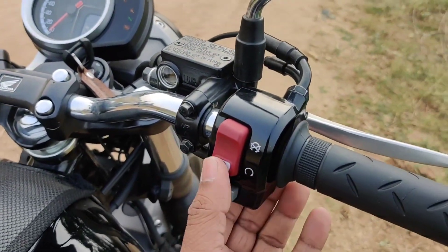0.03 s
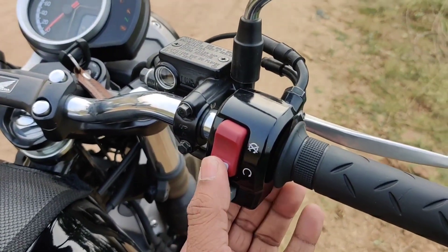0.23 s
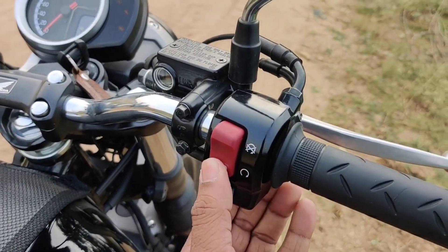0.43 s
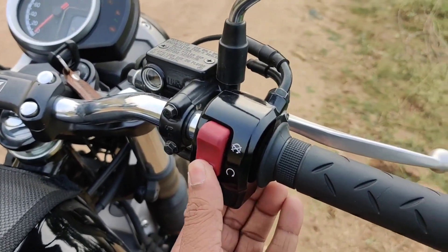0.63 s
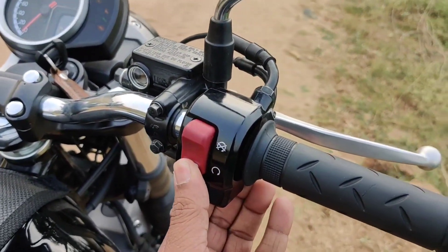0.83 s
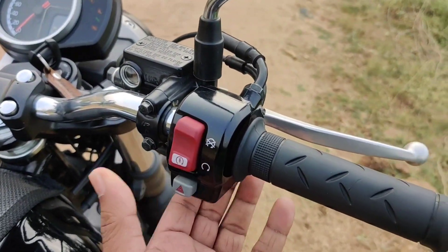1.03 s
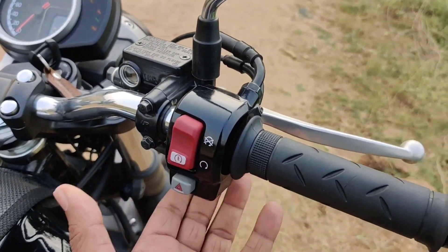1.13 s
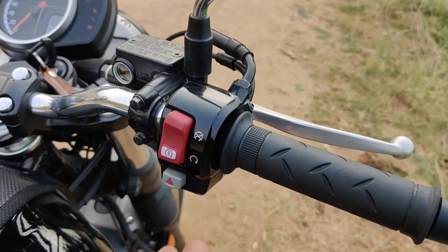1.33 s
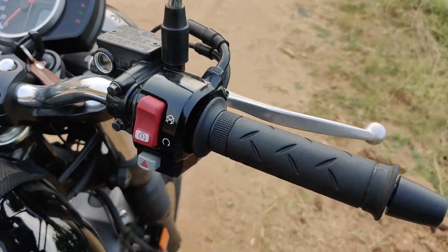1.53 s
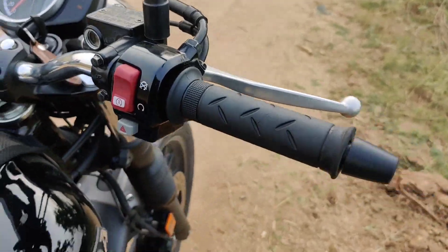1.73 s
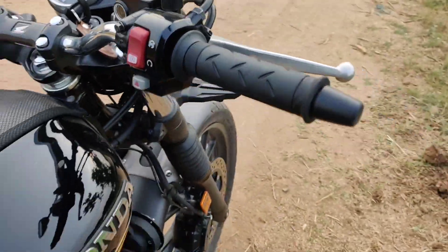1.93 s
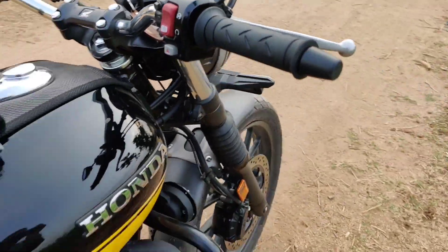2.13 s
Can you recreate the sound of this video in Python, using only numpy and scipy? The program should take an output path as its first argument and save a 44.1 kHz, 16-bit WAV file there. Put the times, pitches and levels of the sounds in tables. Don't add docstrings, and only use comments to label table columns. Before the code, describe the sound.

A motorcycle engine starts outdoors, heard close on a phone. Light low wind and a faint falling bird call fill the first 0.4 seconds. At 0.43 the starter clicks in, grinding and whining in uneven, raspy surges until about 0.92. The engine fires with a bark at 0.95, stumbles softly, thumps again at 1.2, then idles at roughly nine low thumps per second with metallic valve and chain clatter.

```python
import sys
import numpy as np
from scipy import signal
from scipy.io import wavfile
from scipy.ndimage import uniform_filter1d

SR = 44100
rng = np.random.default_rng(int(sys.argv[2]) if len(sys.argv) > 2 else 0)


def undo_db(level):
    steps = np.asarray(level, float) / 20
    return 10 ** steps


def persist_wave(psi):
    counts = np.round(np.clip(psi, -1, 1) * 32767).astype(np.int16)
    wavfile.write(sys.argv[1], SR, np.atleast_2d(counts).T)


N = 95697

# [f/Hz, level/dB per Hz]
WIND = [(12, -17), (20, -10.5), (91, -5.5), (107, -17.5), (140, -10.5), (161, -12.5), (300, -26),
        (480, -52), (1540, -120)]
# [t/s, level/dB]
HUM_LEVEL = [(0, -52.5), (.145, -55), (.149, -42.5), (.16, -55), (.3, -48.5), (.42, -55)]
# [f/Hz, width/Hz, level/dB]
HUM_BANDS = [(1160, 990, 0.5), (3040, 1040, -8.5), (4640, 130, -1)]
# [start t/s, length/s, from f/Hz, to f/Hz, level/dB]
BIRD = [
    (.085, .035, 6300, 7000, -66),
    (.137, .125, 7800, 5200, -52),
    (.29, .05, 5000, 3900, -68),
    (0, .012, 7000, 6900, -49),
]
# [start t/s,
# length/s, level/dB, place of the peak 0-1]
STRAINS = [(0.432, 0.0076, -20.5, 0.4), (0.443, 0.011, -20, 0.3), (0.458, 0.089, -25, 0.4),
           (0.589, 0.14, -24, 0.17), (0.708, 0.13, -22, 0.52), (0.864, 0.029, -22, 0.37),
           (0.883, 0.036, -18.5, 0.59), (.985, 0.0262, -28.5, 0.2), (1.016, 0.012, -34.5, 0.2),
           (1.292, 0.0057, -45, 0.1), (1.96, 0.0098, -45, .1)]
# [f/Hz, width/Hz, level/dB]
CASING = [(819, 35, -1), (1307, 80, -1), (1688, 180, 7.5), (2196, 63, -0.5), (2990, 240, 3.5),
          (3560, 49, -0.5), (4846, 58, 3), (5430, 75, -1), (7400, 800, 11)]
# [start t/s, length/s, from f/Hz, to f/Hz, level/dB]
WHINES = [(.476, .022, 2950, 3350, -24), (.492, .02, 3400, 3700, -27), (.508, .032, 3550, 4150, -25),
          (.535, .02, 3950, 4000, -35), (.49, .03, 2850, 2850, -36), (.518, .016, 2900, 2930, -20),
          (.534, .026, 2850, 3400, -22), (.56, .04, 3450, 4150, -25), (.598, .022, 4130, 4200, -30),
          (.48, .014, 9500, 9500, -30), (.52, .016, 8900, 8800, -33), (.885, .03, 2900, 3300, -24),
          (.9, .07, 4050, 4800, -38), (1.125, .045, 4250, 4010, -33), (1.163, .042, 4010, 3970, -31),
          (1.43, .035, 4100, 3980, -38)]
# [start t/s, length/s, from f/Hz, to f/Hz, level/dB]
PANELS = [(.6, .04, 770, 770, -29), (.755, .055, 1800, 1800, -26), (.754, .018, 4870, 4860, -21),
          (.898, .018, 790, 790, -27), (.432, .007, 1250, 950, -31), (.432, .008, 3300, 3100, -27),
          (.433, .02, 800, 760, -31), (.445, .012, 3450, 3450, -30), (.645, .012, 4850, 4800, -26),
          (.84, .025, 4900, 5050, -35), (.505, .035, 720, 700, -33)]
# [start t/s, length/s, from f/Hz, to f/Hz, level/dB]
FINS = [(1.69, 0.013, 2400, 2420, -41), (1.8, 0.024, 2376, 2370, -38), (1.855, 0.019, 2435, 2485, -33),
        (1.91, 0.029, 1666, 1660, -35), (1.965, 0.018, 2380, 2330, -32), (1.97, 0.021, 3100, 3050, -33),
        (1.975, 0.033, 1720, 1714, -33.5), (2.028, 0.027, 1660, 1700, -31), (2.082, 0.031, 2300, 2290, -32),
        (2.089, 0.023, 1640, 1587, -30.5), (2.122, 0.039, 932, 950, -39.5)]
# [t/s, level/dB]
GROWL = [(.43, -60), (.445, -16), (.48, -5.5), (.565, -8.5), (.595, -32), (.64, -6), (.72, -33),
         (.8, -13.5), (.9, -10.5), (.97, -12), (1.05, -18), (2.17, -18.5)]
# [crest t/s, level/dB, f/Hz, silencer ring level/dB]
MISFIRES = [
    (0.6294, -16.5, 64, -22.5),
    (1.0676, -7, 65, -22),
]
# [t/s, puff level/dB, silencer ring level/dB, puff f/Hz, bark level/dB]
FIRINGS = [
    (0.9505, -3.5, -13, 90, -12.5),
    (1.196, -3.5, -13.5, 93, -21.5),
    (1.3172, -5.5, -14.5, 92, -27),
    (1.4293, -5.5, -14, 96, -28),
    (1.545, -8, -15, 91.4, -49),
    (1.6594, -8, -15.5, 96, -40),
    (1.7727, -8.5, -14.5, 91.7, -43),
    (1.885, -7.5, -14, 96.5, -33),
    (1.9976, -6.5, -14.5, 93.7, -26),
    (2.1106, -7.5, -14, 94, -42),
]
# [f/Hz, level/dB]
GAS = [(40, -0.5), (130, -5.5), (300, -3), (450, -3.5), (900, -28), (3000, -60.5)]
# [t/s, level/dB]
CLATTER = [(.9, -68), (.93, -31), (1.0, -31), (1.2, -31), (1.5, -31), (1.8, -32), (2.0, -33), (2.17, -29.5)]
# [f/Hz, width/Hz, level/dB]
CASES = [(816, 115, -1), (1325, 230, -2), (1500, 385, 4), (2420, 58, -5.5), (3200, 280, 0), (4060, 12, -17),
         (4810, 470, -5), (8170, 670, -2)]
# [lead/s, spread/s, level/dB]
VALVES = [
    (0.017, 0.014, -3),
    (0.083, 0.0079, -4),
    (0.0683, 0.0024, -10),
]
# [t/s, level/dB]
KNOCKS = [(0.6482, -29), (0.6714, -25), (0.7347, -39), (0.7577, -25), (0.867, -26), (0.9474, -37),
          (0.9871, -10.5), (1.0136, -33), (1.0358, -14), (1.1652, -18.5), (1.2294, -28), (1.287, -32),
          (1.341, -28), (1.5244, -39), (1.634, -23), (1.679, -28), (1.692, -19.5), (1.7495, -19),
          (1.799, -32), (1.8577, -26), (1.919, -26), (1.9689, -38), (2.084, -34), (2.1306, -34)]
# [f/Hz, width/Hz, level/dB]
HEAD = [(866, 740, 2), (2375, 95, 4), (3046, 94, -3), (4850, 590, -1), (7200, 1600, 0)]
# [t/s, level/dB]
TAPPETS = [(.95, -39.5), (1.5, -35), (1.8, -29), (2.17, -30)]
# [f/Hz, level/dB]
LEFT = [(250, 5), (700, 2), (3300, -0.5), (4250, -1.5), (5100, 1), (6000, -14.5), (9500, -17.5),
        (16000, -24)]
# [f/Hz, level/dB]
RIGHT = [(250, 6.5), (700, -5.5), (1100, 0.5), (2000, 0), (3300, -14.5), (4300, -24), (6000, -48.5),
         (16000, -48.5)]
# [t/s, f/Hz, boost level/dB]
CUP = [(0, 1270, 3.5), (.45, 1470, 12.5), (1.0, 1500, 15), (1.35, 1500, 15.5), (1.78, 1493, 13.5),
       (1.87, 1530, 11), (2.17, 1680, -6)]


def evened(x):
    return x / np.sqrt(np.mean(x ** 2) + 1e-20)


def along(curve, axis=1):
    points = np.array(curve)
    return np.interp(np.arange(N) / SR, points[:, 0], points[:, axis])


def bump(t, width):
    return np.exp(-.5 * (t / width) ** 2)


def burst(t, rise, fall):
    return np.exp(-abs(t) / np.where(t < 0, rise, fall))


def highpass(x, order, hz):
    return signal.lfilter(*signal.butter(order, hz, "high", fs=SR), x)


def colour(x, points):
    hz = np.fft.rfftfreq(4096, 1 / SR)
    f, db = np.transpose(points)
    log_gain = np.log(undo_db(np.interp(np.log(hz + 1), np.log(f), db)))
    full = np.concatenate([log_gain, log_gain[-2:0:-1]])
    minimum_phase = np.exp(np.conj(signal.hilbert(full)))
    response = np.fft.ifft(minimum_phase).real[:2048]
    return signal.oaconvolve(x, response)[:N]


def resonate(x, hz, width):
    turn = np.exp(2j * np.pi * np.cumsum(hz * np.ones(N)) / SR)
    r = np.exp(-np.pi * width / SR)
    return 2 * (turn * signal.lfilter([1 - r], [1, -r], x / turn)).real


def patchy(x, depth_db):
    z = signal.stft(x, nperseg=256)[2]
    field = uniform_filter1d(rng.standard_normal(z.shape[1:]), size=7, axis=0)
    field = uniform_filter1d(field, size=8, axis=1)
    return signal.istft(z * undo_db(depth_db * evened(field)), nperseg=256)[1][:, :N]


def rattle(modes, per_s, spread_db, rub, broad_db):
    size = undo_db(spread_db * np.minimum(rng.exponential(1, (2, N)), 3))
    size = size * (rng.random((2, N)) < per_s / SR)
    hits = evened(size * rng.standard_normal((2, N)))
    noise = rng.standard_normal((2, N))
    rung = 0
    for hz, width, db in modes:
        struck = np.roll(hits + rub * noise, rng.integers(N), axis=1)
        rung = rung + undo_db(db) * evened(resonate(struck, hz, width))
    broad = highpass(patchy(noise + 0.29 * hits, depth_db=4.5), 2, 375)
    return evened(rung + undo_db(broad_db) * broad)


def glides(table, throb_hz, depth):
    t, out = np.arange(N) / SR, np.zeros(N)
    waver = evened(uniform_filter1d(rng.standard_normal(N), size=200))
    for start, length, from_hz, to_hz, db in table:
        u = np.clip((t - start) / length, 0, 1)
        hz = to_hz + (from_hz - to_hz) * (1 - u) ** 1.25
        hz = hz * (1 + .005 * waver)
        throb_turn = 2 * np.pi * (throb_hz * t + rng.random()) + 0.85 * np.roll(waver, 999)
        throb = 1 + depth * np.sin(throb_turn)
        out += undo_db(db) * np.sin(np.pi * u) ** .5 * throb * np.sin(2 * np.pi * np.cumsum(hz) / SR)
    return out


def wind():
    lumps = uniform_filter1d(rng.standard_normal(N), size=1500)
    lumps = evened(uniform_filter1d(lumps, size=1500))
    spectrum = [(5, -53.0)] + list(WIND) + [(3000, -120)]
    a, b = [evened(colour(noise, spectrum)) for noise in rng.standard_normal((2, N))]
    return undo_db(-43.5 + 2.55 * lumps) * np.array([a, 0.81 * a + 0.38 * b])


def far_hum():
    air = rng.standard_normal((2, N))
    hum = signal.lfilter(*signal.butter(1, 7000, fs=SR), air)
    for hz, width, db in HUM_BANDS:
        hum += undo_db(db + 6.0) * resonate(air, hz, width)
    return undo_db(along(HUM_LEVEL) - 5) * hum


def bird():
    return glides(BIRD, throb_hz=28.5, depth=0.43)


def starter():
    t, strain = np.arange(N) / SR, np.zeros(N)
    for start, length, db, peak in STRAINS:
        u = np.clip((t - start) / length, 0, 1)
        strain += undo_db(db) * np.minimum(u / peak, (1 - u) / (1 - peak)) ** 0.37
    on = uniform_filter1d(1. * (t > .445) * (t < .93), size=300)
    coast = undo_db(-28.5) * on * rattle(CASING[:7], per_s=3000, spread_db=0.0, rub=1.0, broad_db=10)
    rasp = highpass(patchy(rng.standard_normal((2, N)), depth_db=7.0), 2, 5340)
    coast += undo_db(21) * strain ** 2 * (.4 + 0.54 * on) * rasp
    unsteady_db = 2.0 * evened(uniform_filter1d(rng.standard_normal(N), size=350))
    grind = strain * undo_db(unsteady_db) * rattle(CASING, per_s=2500, spread_db=-0.5, rub=0.81, broad_db=7.0)
    return grind + coast + glides(WHINES + PANELS + FINS, throb_hz=75, depth=0.45)


def silencer(t):
    ring_hz, trough_s, peak_s = 43, 0.0182, 0.027
    rising = t < peak_s
    swell = abs((t - peak_s) / np.where(rising, 0.017, 0.016))
    swell = np.exp(-.5 * swell ** np.where(rising, 2, 1.6))
    turn = 2 * np.pi * ring_hz * (t - trough_s)
    return -(np.cos(turn) + 0.09 * np.cos(3 * turn)) * swell


def exhaust():
    clock, out = np.arange(N) / SR, np.zeros(N)
    flow = undo_db(along(GROWL))
    for s, puff_db, ring_db, hz, bark_db in FIRINGS:
        t = clock - s
        u = (t - 0.00052) * hz / 0.48
        puff = -np.cos(2 * np.pi * hz * t) * np.exp(-.5 * abs(u) ** np.where(u < 0, 3.37, 2))
        overtone = undo_db(-24) * np.cos(2 * np.pi * 298 * t) * bump(t, 0.0059)
        bark = np.cos(2 * np.pi * 770 * t) * bump(t, 0.0011)
        header = np.sin(2 * np.pi * 274 * t) * burst(t, .002, 0.0216)
        out += undo_db(puff_db) * (puff + overtone) + undo_db(ring_db) * silencer(t)
        out += undo_db(bark_db) * (bark + undo_db(-13) * header)
        flow += undo_db(puff_db) * burst(t, .003, 0.032)
        flow += undo_db(-10.5) * bump(t + 0.028, 0.012)
    for s, db, hz, ring_db in MISFIRES:
        t = clock - s
        out += undo_db(db) * np.cos(2 * np.pi * hz * t) * bump(t - .002, 0.3 / hz)
        out += undo_db(ring_db) * silencer(t - .004)
        flow += undo_db(db - 3.0) * bump(t, 0.029)
    thumps = np.interp(np.arange(N) - [[0], [9]], np.arange(N), out)
    return thumps + undo_db(-30.5) * flow * evened(colour(rng.standard_normal(N), GAS))


def clatter():
    t = np.arange(N) / SR
    valves, knocks = np.zeros(N), np.zeros(N)
    for row in FIRINGS + MISFIRES[1:]:
        for lead, spread, db in VALVES:
            valves += undo_db(db) * bump(t - row[0] + lead, spread)
    for s, db in KNOCKS:
        knocks += undo_db(db - 10) * burst(t - s, .0004, 0.0029)
    cases = rattle(CASES, per_s=900, spread_db=4.0, rub=.8, broad_db=4)
    head = rattle(HEAD, per_s=700, spread_db=3.0, rub=.5, broad_db=-4)
    cases = undo_db(along(CLATTER)) * (1 + .3 * valves) * cases
    return cases + (undo_db(along(TAPPETS)) * valves + knocks) * head


def ports(pair):
    shared, lag_s = 0.57, 0.00019
    mixed = shared * pair[0] + np.sqrt(1 - shared ** 2) * pair[1]
    mixed = pair[0] + highpass(mixed - pair[0], 1, 654)
    mixed = np.interp(np.arange(N) - lag_s * SR, np.arange(N), mixed)
    hollow = undo_db(along(CUP, axis=2)) * resonate(mixed, along(CUP), 172)
    return np.array([colour(pair[0], LEFT), colour(mixed + hollow, RIGHT)])


def scene():
    through_ports = ports(far_hum() + bird() + starter() + clatter())
    return wind() + through_ports + exhaust() * undo_db([[.5], [-.5]])


def top_cut(x):
    return signal.sosfilt(signal.butter(12, 15830, fs=SR, output="sos"), x)


def record(dry):
    hiss = undo_db([[-71], [-72]]) * rng.standard_normal((2, N))
    lowpass = signal.firwin(255, 15500, fs=SR)
    mix = signal.oaconvolve(dry + hiss, lowpass[None], "same")
    return top_cut(mix)


dry = scene()
out = record(dry)
persist_wave(out)
```